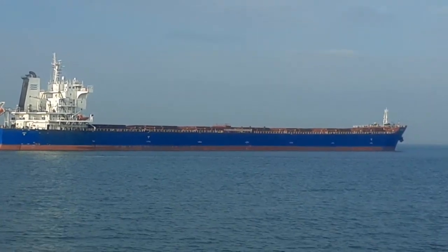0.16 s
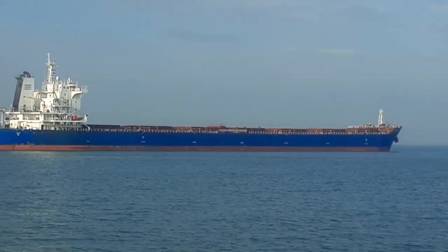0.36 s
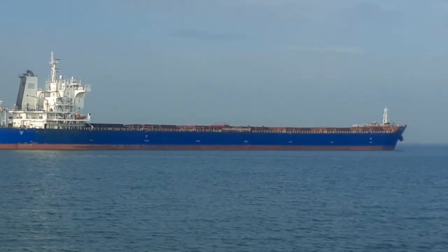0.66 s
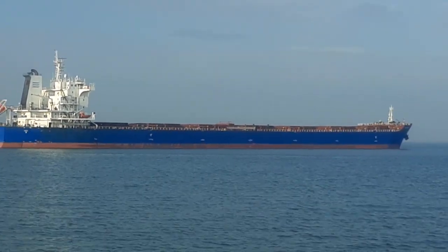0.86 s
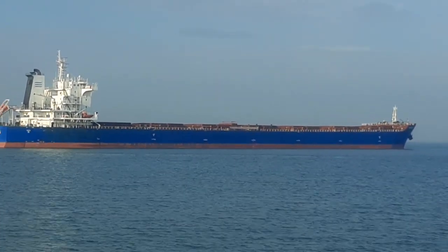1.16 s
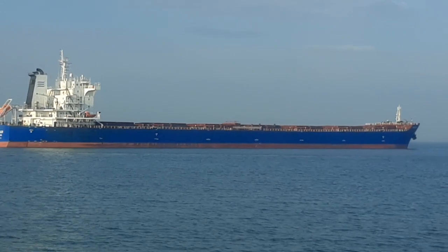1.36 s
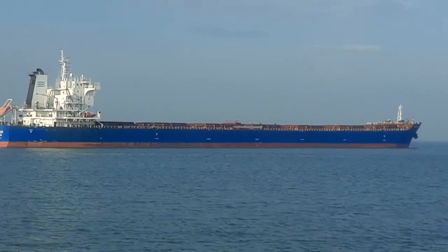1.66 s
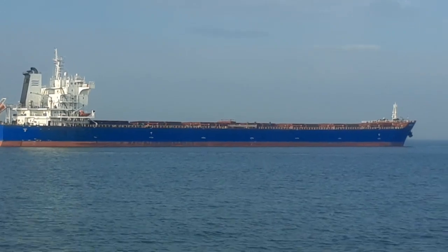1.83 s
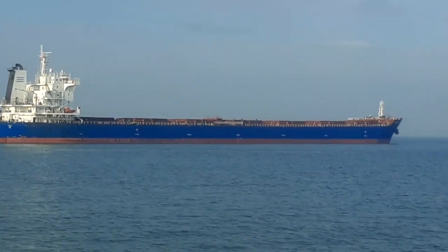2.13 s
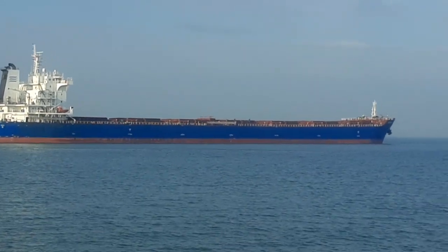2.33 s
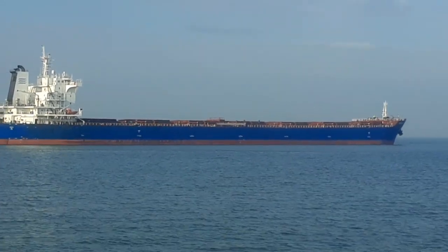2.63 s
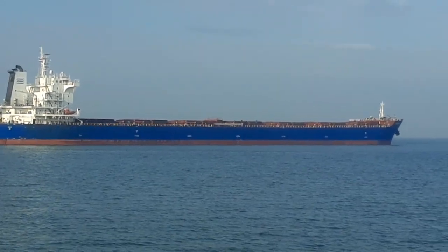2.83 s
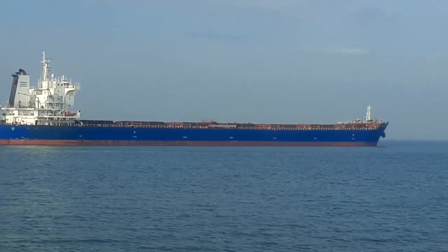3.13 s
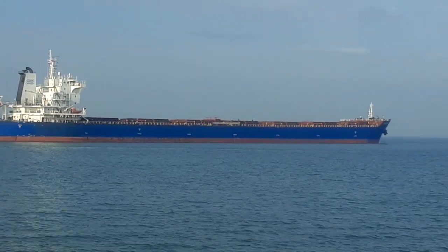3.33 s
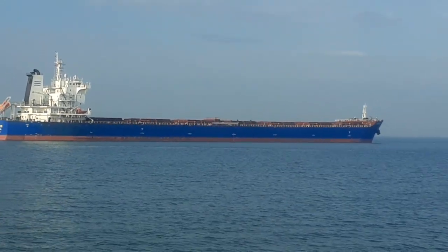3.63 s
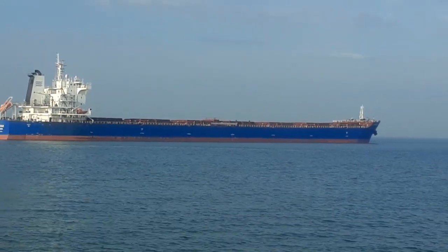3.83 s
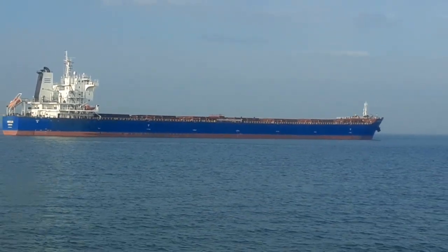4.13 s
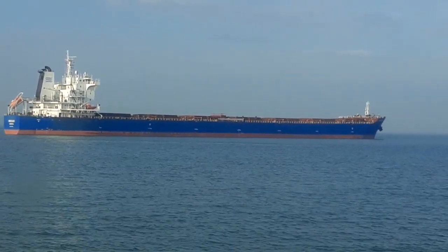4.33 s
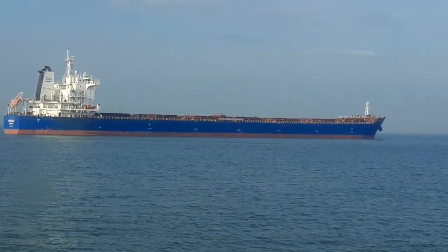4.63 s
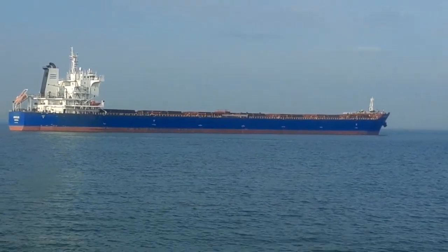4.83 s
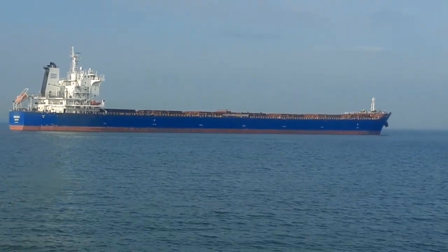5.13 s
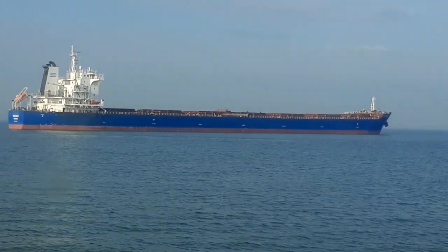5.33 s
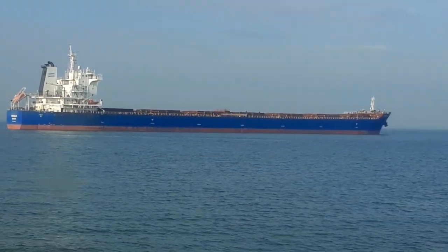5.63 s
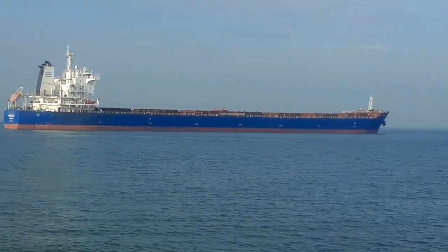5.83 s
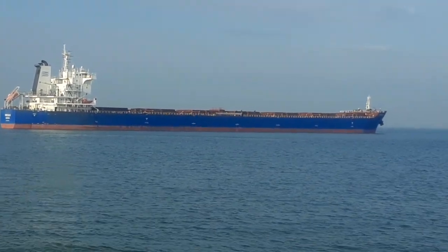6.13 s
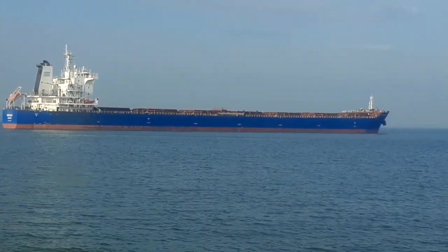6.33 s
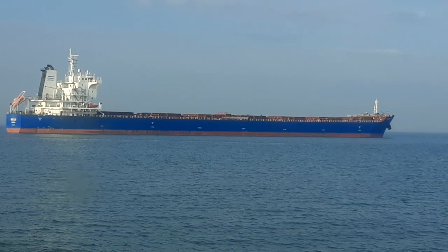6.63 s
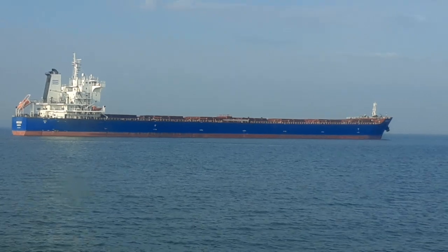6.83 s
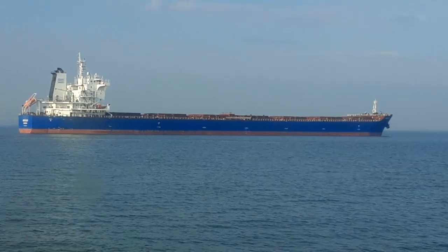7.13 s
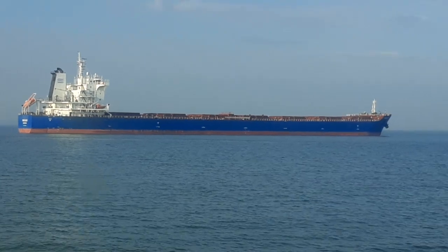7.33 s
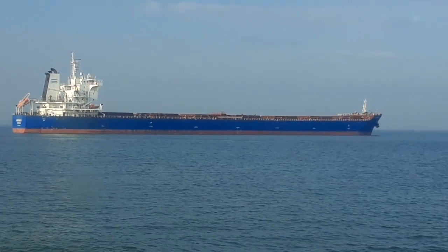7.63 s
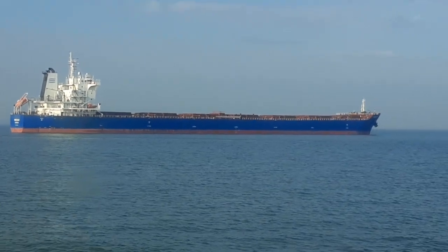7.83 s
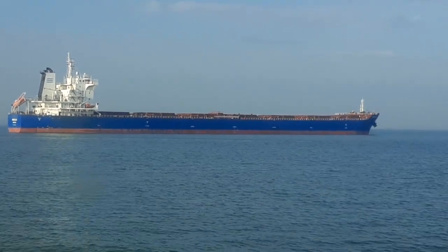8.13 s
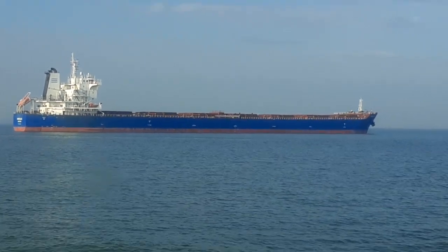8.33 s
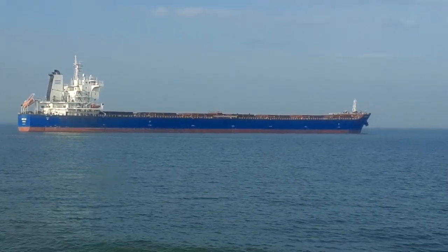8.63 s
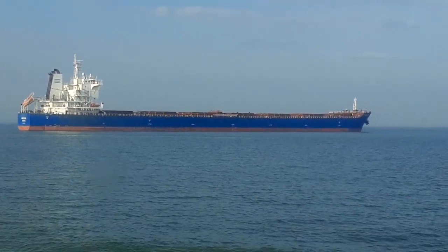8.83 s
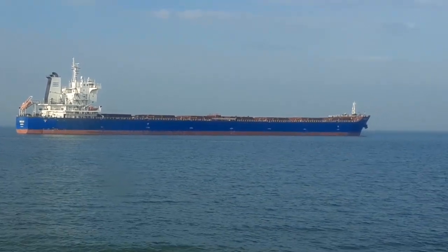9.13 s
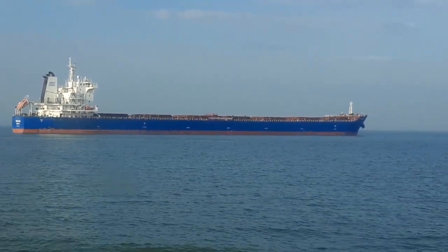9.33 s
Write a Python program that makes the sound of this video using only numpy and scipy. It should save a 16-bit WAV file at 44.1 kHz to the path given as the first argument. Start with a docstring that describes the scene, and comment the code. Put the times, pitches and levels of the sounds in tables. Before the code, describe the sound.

A diesel engine drones at a steady speed for the whole nine and a half seconds, heard from the deck of a boat on open water and louder on the left. Its deep hum pulses unevenly in loudness inside a low, throbbing roar of exhaust and hull. A vibrating panel sings a constant, slightly fluttering mid-pitched tone above it. A very low boom swells and fades irregularly, strongest at about 0.4, 1.6 and 3.4 seconds, and again around 4.8, 6.5 and 7.2 seconds. Faintly behind the drone, a loose metal fitting rattles all the way through in quick, uneven, tinny ticks with brief pauses. A thin, very faint machinery whine sits to the right. Two tiny, very high squeaks pass at about 3.7 and 8.8 seconds. The engine carries on unchanged to the end.

```python
"""A diesel drones at a steady speed, heard from the deck of a boat under way on open water.
A low boom swells and fades in the roar of exhaust and hull, and a panel sings on two high multiples of
the engine cycle. Faint behind these, the propeller shaft rattles a loose metal fitting, an auxiliary
whines and two high squeaks pass. The left microphone of the pair faces the engine; the bass is
louder there but moves nearly alike on both sides, while the treble is scattered."""
import sys
import numpy as np
from scipy import signal
from scipy.fft import irfft
from scipy.io import wavfile

SR = 44100
rng = np.random.default_rng(int(sys.argv[2]) if len(sys.argv) > 2 else 0)


def master_out(mix):
    """Clip the mix to full scale and print it as 16-bit PCM to the path in sys.argv[1]."""
    frames = np.transpose(np.atleast_2d(mix))
    ceiling = np.clip(frames, -1, 1)
    pcm = np.round(ceiling * 32767).astype(np.int16)
    wavfile.write(sys.argv[1], SR, pcm)


N = 417627

# balance of the microphone pair: (frequency [Hz], left minus right [dB])
BALANCE = [(30, 11.5), (70, 1), (100, 12.5), (140, 3), (205, 5.5), (320, 3), (450, 2.5), (610, 11.5),
           (800, 8.5), (1600, 1.2), (2700, -1.5), (4400, 5.5), (6500, -4.5), (9500, -0.3)]
# phase across the pair: (frequency [Hz], lead of the left microphone [rad])
LEFT_LEAD = [(30, -1.05), (80, -.4), (250, -.45), (320, .05), (560, .1), (590, -2.3), (625, -1.5),
             (660, -.3), (800, .1), (870, 1), (960, 3), (1200, 2)]


def gain_of(db):
    """Decibels to amplitude."""
    return 10 ** (np.asarray(db) / 20)


def unit_rms(x):
    """Scales to rms 1."""
    return x / np.sqrt(np.mean(x ** 2) + 1e-20)


def at_hz(points, hz):
    """Reads a table on a logarithmic frequency axis."""
    f, value = np.transpose(points)
    return np.interp(np.log(hz + 1), np.log(f + 1), value)


def curve(rows):
    """Reads a time table, sample by sample."""
    s, value = np.transpose(rows)
    return np.interp(np.arange(N) / SR, s, value)


def wander(top_hz):
    """A slow random sway of rms 1, no faster than top_hz."""
    t = np.arange(N // 256 + 2) * 256 / SR
    hz = np.geomspace(top_hz / 20, top_hz, num=16)[:, None]
    slow = (np.sin(2 * np.pi * (hz * t + rng.random((16, 1)))) / np.sqrt(hz)).sum(0)
    return np.interp(np.arange(N) / SR, t, unit_rms(slow))


def split(x, hz):
    """The parts below and above hz."""
    low = signal.sosfiltfilt(signal.butter(2, hz, fs=SR, output="sos"), x)
    return low, x - low


def tone(angle, hz, db, balance_db, scatter=0):
    """A sine at both microphones; scatter is an extra phase from the many paths of high tones."""
    left = np.sqrt(2) * gain_of(db)
    right = left / gain_of(balance_db)
    return np.array([left * np.cos(angle), right * np.cos(angle - at_hz(LEFT_LEAD, hz) - scatter)])


def auxiliary_whine():
    """An auxiliary's thin tone, off to the right, trembling in pitch."""
    # at the left microphone: (time [s], level [dB])
    level = [(0, -79), (.5, -70), (1.2, -74.5), (2.2, -75), (3.5, -76), (4.4, -81), (4.65, -69),
             (5.7, -70.5), (6.3, -74), (7.2, -72), (8.2, -79), (9, -72), (9.47, -69)]
    hz = 5931
    angle = 2 * np.pi * np.cumsum(hz + 5 * wander(11)) / SR
    return tone(angle, hz, curve(level) + .8 * wander(14), balance_db=-7, scatter=0.26)


def squeaks():
    """Two brief, high swells of narrow noise."""
    # each squeak: (start [s], length [s], centre [Hz], width [Hz], level [dB])
    events = [(3.657, 0.19, 11200, 121, -71), (8.83, .13, 14200, 1200, -59)]
    out = np.zeros((2, N))
    for s, length, hz, width, db in events:
        t = np.arange(round(length * SR)) / SR
        fuzz = signal.lfilter(*signal.butter(2, width / SR), rng.standard_normal((2, len(t))))
        band = unit_rms(fuzz * np.cos(2 * np.pi * hz * t))
        at = round(s * SR)
        out[:, at:at + len(t)] += gain_of(db) * band * signal.windows.tukey(len(t), .4)
    return out


def sheet_ring():
    """One blow on the metal sheet at both microphones: a dense tail and some clear modes."""
    # colour of the tail: (frequency [Hz], gain [dB])
    tail_colour = [(1500, -15.5), (2700, -2), (3600, -2), (4200, 2.5), (4600, 3), (4800, -1.5),
                   (6000, -0.5), (7000, -6), (8000, -4.5), (9500, -7), (11000, -4), (13000, 0), (15800, -3)]
    # decay of the tail: (frequency [Hz], t60 [s])
    tail_t60 = [(3000, 0.76), (8000, 0.3), (15000, 0.23)]
    # modes that stand out: (frequency [Hz])
    mode_hz = [2911, 2964, 3510, 3645, 4000, 4289, 4410, 4465, 4586, 4655, 5245, 5678, 6038, 7868, 8031,
               9020, 11000, 11800, 13766]
    # the same modes in order: (relative level [dB], t60 [s])
    modes = [(-22, .25), (-24.5, 0.29), (-17.5, 0.29), (-17, 0.29), (-14.5, .25), (-13.5, 0.29), (-14, .25),
             (-14, 0.3), (-15, 0.28), (-14, 0.29), (-23, 0.27), (-19, .2), (-21, 0.2), (-26, 0.2),
             (-27, .18), (-30, 0.15), (-28, .12), (-28, 0.12), (-26, .12)]
    t = np.arange(SR // 3) / SR
    hz, frame_s, tail = signal.stft(rng.standard_normal((2, len(t))), SR, nperseg=256)
    tail *= gain_of(at_hz(tail_colour, hz)[:, None] - 60 * frame_s / at_hz(tail_t60, hz)[:, None])
    tail[1] /= gain_of(at_hz(BALANCE, hz))[:, None]
    out = signal.istft(tail, SR, nperseg=256)[1][:, :len(t)]
    phases = 2 * np.pi * rng.random((len(mode_hz), 2))
    for f, (db, t60), (start, scatter) in zip(mode_hz, modes, phases):
        beat = 1 + 0.8 * np.cos(2 * np.pi * 14 * t + start)  # close neighbours widen each mode
        out += beat * tone(2 * np.pi * f * t + start, f, db - 60 * t / t60, at_hz(BALANCE, f), scatter)
    return out * (1 - np.exp(-t / 0.0034))


def fitting_rattle(shaft_hz):
    """The shaft knocks a loose fitting on three spots of a sheet, between clear blows and pauses."""
    # the clearest blows: (time [s], strength [dB])
    clear_blows = [(0.0696, -55), (0.1406, -56), (0.28, -50), (0.366, -45.5), (0.5072, -47), (0.6135, -50),
                   (0.6756, -50), (0.837, -48), (0.9507, -49), (1.258, -46.5), (1.3433, -51), (1.3915, -48),
                   (1.696, -53), (1.8093, -53), (1.8911, -52), (1.9639, -54), (2.0014, -50), (2.176, -52),
                   (2.268, -47), (2.387, -49), (2.5476, -52), (2.6214, -50.5), (2.8066, -49.5),
                   (2.8549, -50), (2.9614, -46), (3.0886, -54), (3.201, -58), (3.323, -46.5), (3.4316, -52),
                   (3.5159, -48), (3.6292, -49), (3.6604, -47), (3.8207, -48.5), (3.9232, -52),
                   (4.0113, -50), (4.0931, -52), (4.132, -48), (4.2507, -59), (4.2996, -49), (4.365, -52),
                   (4.4376, -55), (4.5281, -53), (4.5989, -49), (4.7187, -50), (4.787, -46.5),
                   (4.9873, -49.5), (5.022, -47), (5.1013, -52), (5.1362, -49.5), (5.257, -52),
                   (5.4146, -52.5), (5.449, -48), (5.5897, -51), (5.683, -48), (5.7114, -47.5),
                   (5.836, -47.5), (6.068, -48), (6.2256, -48.5), (6.4963, -47), (6.5455, -59),
                   (6.6139, -51), (6.65, -49.5), (6.689, -51), (6.765, -51), (6.8438, -46.5), (6.9853, -50),
                   (7.0773, -50), (7.1477, -51), (7.1955, -50), (7.311, -50), (7.3874, -51), (7.5418, -56),
                   (7.6221, -49), (7.8123, -47.5), (7.9274, -51.5), (7.9768, -51.5), (8.1194, -49),
                   (8.161, -51), (8.2407, -52), (8.2761, -51.5), (8.3365, -50), (8.4682, -48),
                   (8.5886, -47.5), (8.6662, -49), (8.8223, -47), (8.985, -48.5), (9.0518, -49),
                   (9.2055, -47), (9.2845, -49.5), (9.3985, -50)]
    # the fitting floats free: (start [s], length [s])
    pauses = [(0.166, 0.078), (1.6, .09), (3.21, .11), (4.83, .15), (5.33, .08), (5.5, .08), (5.9, .07),
              (6.12, .1), (6.35, .14), (7.55, .07), (7.74, .07), (8.72, .1), (9.3, .09)]
    knock_chance, jitter_s, settle_s, chatter_per_s = .79, .005, .015, 35
    t = np.arange(N) / SR
    clear_s, clear_db = np.transpose(clear_blows)
    float_s = .02 + .003 * clear_s  # no knock lands this long before a clear blow
    gaps = [(s - before, before + settle_s) for s, before in zip(clear_s, float_s)]
    touching = np.ones(N, bool)
    for s, length in pauses + gaps:
        touching[max(round(s * SR), 0):round((s + length) * SR)] = False
    turn_s = np.arange(.0242, N / SR - .02, 1 / shaft_hz)
    luck, weakness, lateness = rng.random((len(turn_s), 3)).T
    knock_s = turn_s + jitter_s * (2 * lateness - 1)
    lands = (luck < knock_chance) & touching[(knock_s * SR).astype(int)]
    knock_db = np.where(lands, -50.5 - 10 * weakness, -200)
    blow_s, blow_db = np.r_[knock_s, clear_s], np.r_[knock_db, clear_db]
    top_db = blow_db - 4.5 + 0.61 * blow_s  # the top treble grows slowly
    spots = rng.integers(3, size=len(blow_s))
    blows = np.zeros((2, 3, N))  # band, spot, sample
    blows[:, spots, (blow_s * SR).astype(int)] = gain_of([blow_db, top_db])
    chatter = rng.standard_normal((3, N)) * (rng.random((3, N)) < chatter_per_s / SR)
    blows += touching * gain_of(-59 - 0.3 * t) * chatter  # weak touches, slowly fading
    out = np.zeros((2, N))
    for spot in range(3):
        for band, train in zip(split(sheet_ring(), hz=9500), blows[:, spot]):
            out += signal.oaconvolve(train[None], band, axes=1)[:, :N]
    return out


def exhaust_and_hull_roar():
    """Broad noise of exhaust and hull; above the bass it swells with the water along the hull."""
    # low rumble at the left microphone: (frequency [Hz], density [dB per Hz])
    lows = [(20, -63), (33, -51), (42, -43.5), (62, -40.5), (80, -38), (92, -33.5), (105, -37.5),
            (120, -46.5), (145, -39.5), (165, -51), (180, -51), (205, -58), (260, -52.5), (330, -57.5)]
    # the roar above it, before the swell: (frequency [Hz], density [dB per Hz])
    highs = [(450, -64.5), (490, -60.5), (550, -63.5), (578, -60.5), (612, -56.5), (645, -59.5),
             (670, -67.5), (800, -71), (1030, -75), (1350, -74), (1560, -79), (2300, -84.5), (2700, -94),
             (3600, -90.5), (5000, -100), (8000, -113), (16000, -114)]
    # likeness of the two microphones: (frequency [Hz], coherence [0-1])
    coherence = [(20, .8), (35, .98), (160, .99), (200, .88), (270, .94), (500, .8), (700, .5), (900, .3),
                 (2500, .15)]
    # swell of the water: (time [s], gain [dB])
    swell = [(0, 0), (1, 0.6), (2, -0.9), (3, 0.7), (3.6, 2), (4.3, -0.1), (5.2, 0), (6.5, 0.6), (7.7, 0.5),
             (8.7, 0), (9.2, 2), (9.47, 0.5)]
    hz = np.fft.rfftfreq(N, 1 / SR)
    a, b, c, d = rng.standard_normal((len(hz), 4)).T
    left, unrelated = a + 1j * b, c + 1j * d
    alike = at_hz(coherence, hz)
    shared = alike * left * np.exp(-1j * at_hz(LEFT_LEAD, hz))
    right = (shared + np.sqrt(1 - alike ** 2) * unrelated) / gain_of(at_hz(BALANCE, hz))
    spectrum = np.array([left, right]) * gain_of(at_hz(lows + highs, hz))
    rumble, rush = split(irfft(spectrum * np.sqrt(N * SR / 4), N), hz=230)
    return rumble + rush * gain_of(curve(swell))


def shaft_throb(shaft_hz):
    """The propeller shaft throbs once a turn."""
    angle = 2 * np.pi * shaft_hz * np.arange(N) / SR
    return tone(angle, shaft_hz, -44.5 + 1.5 * wander(2.1), balance_db=9)


def low_boom():
    """A narrow band of low rumble near 53 Hz, swelling and fading irregularly."""
    # the boom at the left microphone: (time [s], level [dB])
    level = [(0, -35), (.4, -14), (.7, -34), (1.2, -22), (1.6, -15.5), (2.2, -33), (3, -27.5),
             (3.43, -17.5), (3.6, -34), (3.9, -27), (4.5, -30), (4.8, -20.5), (5.05, -27.5), (5.6, -34),
             (6.3, -32.5), (6.5, -19.5), (6.7, -33), (7.23, -20.5), (7.7, -40), (8.2, -24), (8.57, -33),
             (9.3, -25), (9.47, -37)]
    hz = 53.14
    angle = 2 * np.pi * np.cumsum(hz + 2.034 * wander(6)) / SR  # a wandering sine imitates narrow noise
    return tone(angle, hz, curve(level) + 1.3 * wander(6.2), at_hz(BALANCE, hz))


def diesel_drone():
    """Tones at whole multiples (orders) of the engine cycle; two waver widely in level."""
    # engine speed: (time [s], four-stroke cycle rate [Hz])
    speed = [(0, 14.131), (2.25, 14.141), (3.75, 14.142), (4.25, 14.124), (5.75, 14.127), (7.25, 14.141),
             (8.25, 14.126), (9.5, 14.129)]
    # strong tones: (order, left level [dB], left minus right [dB])
    strong_orders = [(3, -35, 7), (6, -31, 5), (7, -20, 7), (8, -31, 6), (9, -30, 4), (12, -44, 4),
                     (14, -45, 12), (15, -49, 7), (16, -48, 3), (21, -49, 3), (22, -50, 2), (26, -50, 5),
                     (27, -52, 8), (28, -55, 5), (29, -53, 2), (30, -51, 5), (31, -56, 1), (38, -53, 13),
                     (39, -55, 7), (40, -47, 12), (42, -33, 14), (44, -39, 20), (46, -55, 6), (49, -62, 7),
                     (52, -61, 7), (53, -62, 6), (54, -56, 20), (55, -62, 10), (56, -59, 10), (57, -57, 18),
                     (64, -63, 13), (65, -63, 8), (68, -60, 8), (71, -63, 11), (74, -60, 6), (78, -66, 7),
                     (82, -66, 3), (84, -68, -6), (88, -62, 9), (92, -66, 12), (94, -64, 16), (96, -62, 13),
                     (98, -66, 10), (102, -63, 16), (103, -66, 8), (106, -65, -4), (110, -68, 6),
                     (114, -73, -7), (115, -67, 2), (117, -77, -10), (122, -66, 5), (123, -67, 1),
                     (125, -66, 5), (128, -66, 4), (132, -70, -3)]
    # the faint tones at other orders sit up to 9 dB under this line: (frequency [Hz], level [dB])
    faint_line = [(200, -54.5), (700, -64.5), (1100, -67.5), (1800, -77.5), (2300, -83), (3000, -91.5)]
    # loudness of the steady firing tone beating with the rumble around it: (time [s], gain [dB])
    beating_with_rumble = [(0, -9), (.2, 4), (.33, -1), (.5, 7.5), (.7, -7), (.95, 7), (1.1, -3),
                           (1.42, 7.5), (1.95, -13), (2.15, -2.5), (2.75, -1.5), (3.15, -0.5), (3.85, 2),
                           (4.7, -0.5), (5.24, 7.5), (5.52, -12.5), (5.9, 3), (6.58, 5), (6.83, -2.5),
                           (7.55, 7.5), (8.06, -11), (8.28, 6), (8.58, -6), (9.35, 2), (9.47, 6.5)]
    # swell and fade of the panel's upper tone: (time [s], gain [dB])
    panel_sway = [(0, 0.5), (2, -1), (2.2, -5), (3.74, 6.5), (4.19, -4), (4.35, 4.5), (4.96, 3.5), (5.3, 1),
                  (6.7, -3), (7.23, 0.5), (8.12, 1.5), (8.41, -7), (8.65, 3.5), (8.83, -8), (9.47, 4)]
    firing_order, panel_orders = 7, (42, 44)
    cycle_angle = 2 * np.pi * np.cumsum(curve(speed)) / SR
    strong = {order: (db, balance_db) for order, db, balance_db in strong_orders}
    sways = [wander(1.7) for _ in range(8)]
    out = np.zeros((2, N))
    for order, (start, path, weakness, side) in enumerate(rng.random((200, 4)), start=1):
        hz = order * speed[0][1]
        faint = at_hz(faint_line, hz) - 9 * weakness, at_hz(BALANCE, hz) + 12 * (side - .5)
        db, balance_db = strong.get(order, faint)
        db = db + (.6 if order in strong else 1.5) * sways[order % 8]
        if order in panel_orders:
            start = -order * .432  # the two beat twice a cycle, loudest at this share of it
        if order == firing_order:
            db = db + curve(beating_with_rumble) + 0.61 * wander(7)
        if order == panel_orders[1]:
            db = db + curve(panel_sway) + 1.1 * wander(8)
        if np.max(db) > -90:
            scatter = 2 * np.pi * path * (hz > 1200)
            out += tone(order * cycle_angle + 2 * np.pi * start, hz, db, balance_db, scatter)
    return out


def scene():
    """All sources as they reach the microphone pair on deck."""
    shaft_hz = 25.81
    drone = diesel_drone() + low_boom() + shaft_throb(shaft_hz) + exhaust_and_hull_roar()
    return drone + auxiliary_whine() + fitting_rattle(shaft_hz) + squeaks()


def record(dry):
    """A steep cut of the highest treble; mirrored margins keep both ends smooth."""
    taps = signal.firwin(1023, cutoff=15870, window=("kaiser", 9), fs=SR)
    padded = np.pad(dry, ((0, 0), (511, 511)), "reflect", reflect_type="odd")
    return signal.oaconvolve(padded, taps[None], "valid")


dry = scene()
out = record(dry)
master_out(out)
```